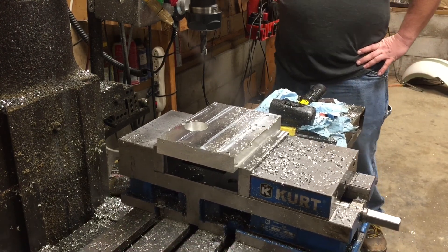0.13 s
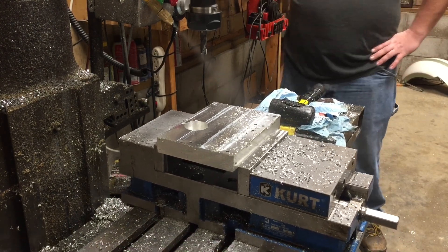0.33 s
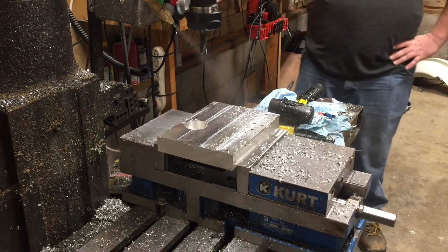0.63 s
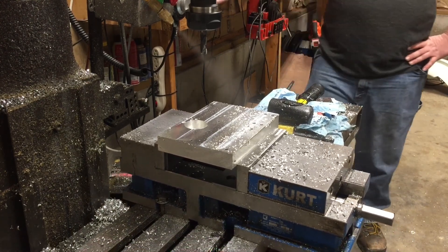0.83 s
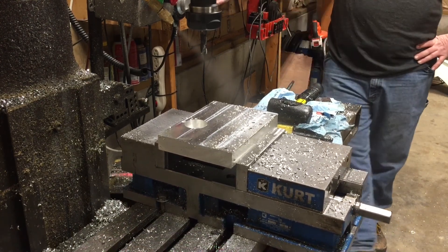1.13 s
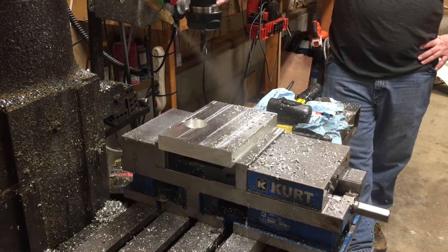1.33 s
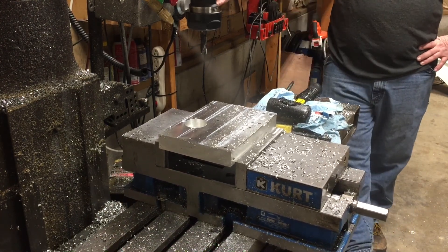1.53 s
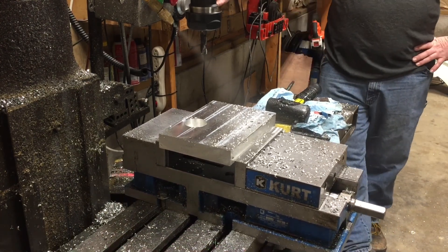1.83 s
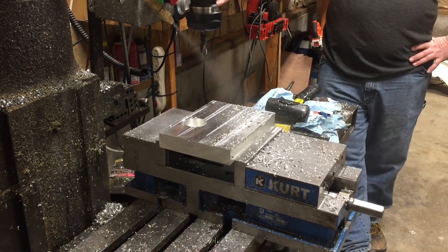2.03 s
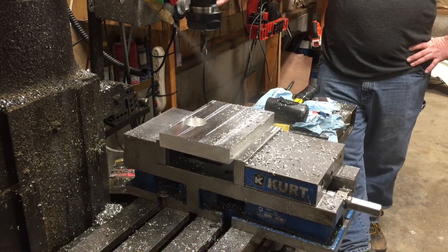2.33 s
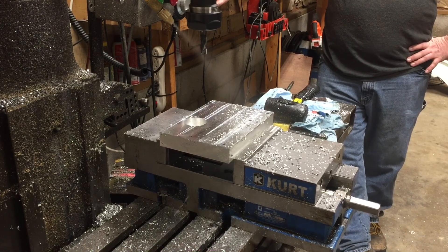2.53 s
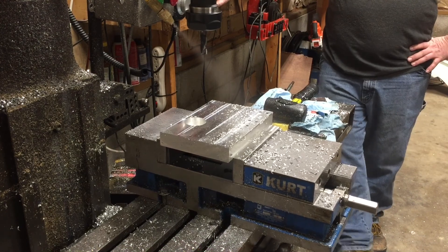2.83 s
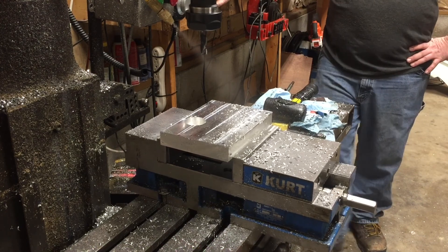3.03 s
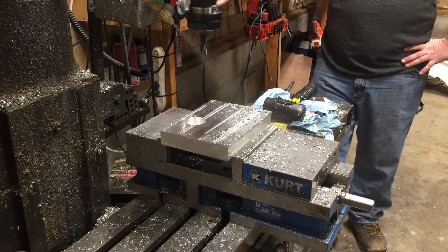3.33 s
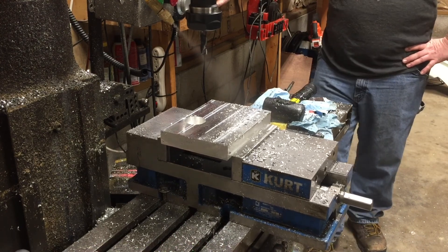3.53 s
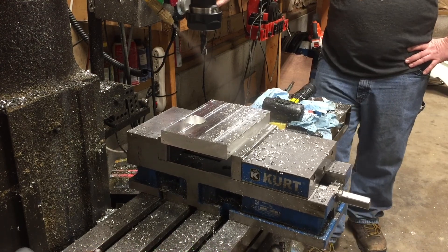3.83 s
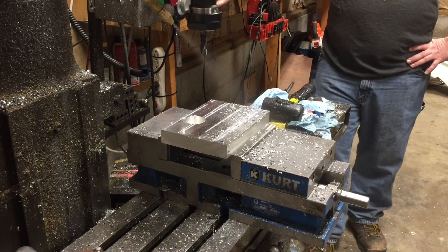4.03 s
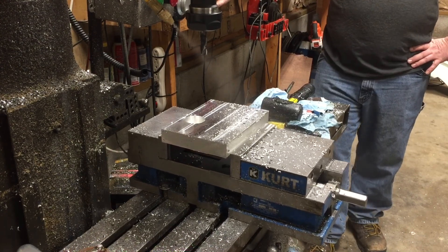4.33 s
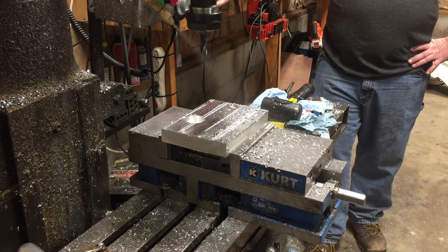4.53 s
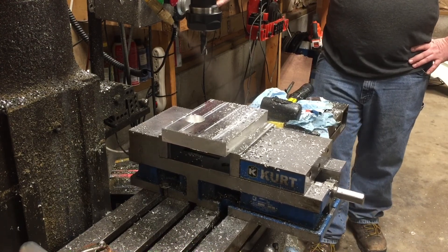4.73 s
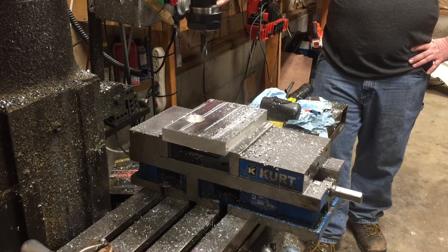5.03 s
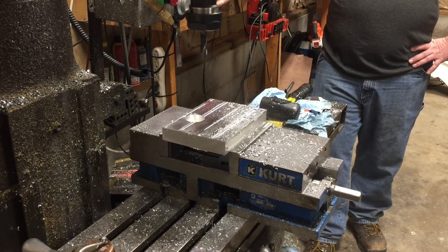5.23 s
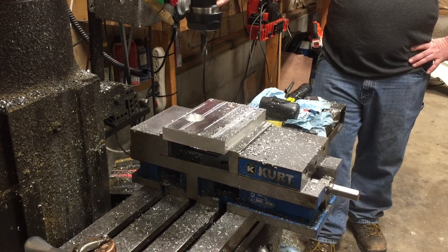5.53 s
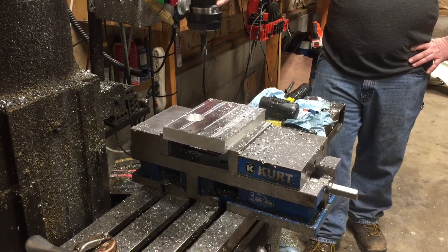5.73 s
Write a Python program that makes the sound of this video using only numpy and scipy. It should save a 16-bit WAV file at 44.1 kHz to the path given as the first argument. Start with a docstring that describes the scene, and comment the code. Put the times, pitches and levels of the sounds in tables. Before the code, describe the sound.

Close, bright, continuous air-jet hiss roaring on metal, with airy ringing that turns hollow, then higher, before the roar fades back.

```python
"""Single microphone held close to a drilled metal plate on a milling machine, in a low, humming workshop.
From the start an air-driven mist sprayer hisses steadily and its jet roars on the plate, with a high ring.
At 0.86 s the ring turns hollow; at 3.65 s it is higher again, and from about 4.5 s the roar eases off.
Hiss, roar and rings are filtered noise and the hum is wavering sines; sliding echoes from nearby steel
comb the treble as the microphone drifts."""
import sys
import numpy as np
from scipy import signal
from scipy.fft import rfft, irfft
from scipy.io import wavfile

SR = 44100
rng = np.random.default_rng(int(sys.argv[2]) if len(sys.argv) > 2 else 0)


def digitize_waveform(pressure):
    """Quantize a signal to 16-bit integers and store it at the path in sys.argv[1].

    Rows of a 2-D input are taken as channels; values are limited to [-1, 1].
    """
    field = np.atleast_2d(pressure).T
    bounded = np.clip(field, -1, 1)
    quanta = np.round(bounded * 32767).astype(np.int16)
    wavfile.write(sys.argv[1], SR, quanta)


N = 259749
TIME = np.arange(N) / SR  # s
BINS = np.fft.rfftfreq(N, 1 / SR)  # Hz

# Colour of the workshop's background. Each row: frequency in Hz, relative level in dB per Hz.
SHOP_COLOUR = [(20, -42), (32, -25), (48, -2.5), (68, -1.5), (100, -6.5), (130, -1.5), (185, -1),
               (235, -5.5), (310, -2), (440, -7.5), (560, -7.5), (900, -22), (2000, -60)]
# Machine hum lines. Each row: frequency in Hz, nominal width in Hz, level in dB relative to the hum level.
HUM_LINES = [(61, 5.1, 1), (125, 4.3, -4.5), (179.6, 3.8, -7)]
# Paths off the work, vise and column. Each row: extra delay at the start, middle and end in ms.
ECHO_PATHS_MS = [(1.5, 1.57, 1.59), (1.14, 1.35, 1.66), (1.07, 1.15, 1.22), (2.33, 2.38, 2.4),
                 (2.44, 2.49, 2.6), (2.76, 2.83, 2.94)]
# Strength of those reflections. Each entry: gain as a plain factor, in the order of the paths.
ECHO_GAINS = [0.13, 0.12, 0.058, 0.033, 0.12, 0.13]
# Colour of the free jet at the nozzle. Each row: frequency in Hz, relative level in dB per Hz.
JET_COLOUR = [(350, -31), (640, -11), (1100, -11), (2200, -17.5), (3950, -17.5), (4850, -22), (5500, -14.5),
              (8000, -13), (9200, -9), (10450, -11.5), (11300, -7), (12200, -4), (14400, -3.5), (15600, -6)]
# Shrill resonance of the narrow orifice. Each row: frequency in Hz, nominal width in Hz, relative level in dB.
ORIFICE_MODES = [(14750, 300, -7), (15250, 240, -3), (15590, 220, 0)]
# Force of the jet on the work; only its changes count. Each row: time in seconds, level in dB.
STRIKE_FORCE = [(0.03, -28.5), (0.08, -27.5), (0.55, -25), (2.95, -24.5), (4.52, -24.5), (5.38, -30.5),
                (5.89, -34.5)]
# Colour of air spreading over the metal. Each row: frequency in Hz, relative level in dB per Hz.
ROAR_COLOUR = [(550, -34), (1100, -7.5), (1800, -5), (2700, 0), (3100, 1.5), (3950, -0.5), (4130, -0.5),
               (4600, -1.5), (4900, -5), (5120, -3.5), (5700, -2), (7700, -6), (10400, -7.5), (11300, -3.5),
               (15000, -21)]
# Breathy edge tones in the roar. Each row: frequency in Hz, nominal width in Hz, relative level in dB.
EDGE_MODES = [(2470, 110, 0), (2640, 150, 1), (3860, 130, 1)]
# Hollow air resonances around the cut. Each row: frequency in Hz, nominal width in Hz, relative level in dB.
HOLLOW_MODES = [(672, 104, -0.5), (837, 144, 2), (1320, 190, 1), (1648, 48, 3.5), (2084, 30, 6.5),
                (2410, 73, 6), (3350, 38, 5), (3670, 93, -1.5), (4600, 160, -5), (5140, 120, -3)]
# Higher air resonances around the cut. Each row: frequency in Hz, nominal width in Hz, relative level in dB.
HIGHER_MODES = [(1123, 90, 0), (1264, 90, -0.5), (1555, 225, 1), (1954, 194, 2), (2234, 140, 0),
                (2890, 250, -4.5), (3690, 190, -5.5), (5270, 58, -18)]
# Low puff of air. Each row: frequency in Hz, nominal width in Hz, relative level in dB.
PUFF_MODES = [(348, 145, 0)]


def amp(db):
    """Turns decibels into gain."""
    return 10 ** (np.asarray(db) / 20)


def unit(x):
    """Scales to an rms of 1."""
    return x / np.sqrt(np.mean(x ** 2) + 1e-20)


def colour(points):
    """Gain at every frequency, from level points joined on a log-frequency axis."""
    hz, db = np.transpose(points)
    return amp(np.interp(np.log(BINS + 1), np.log(hz + 1), db))


def resonances(modes):
    """Gain at every frequency of a set of steep-sided resonances, summed as power."""
    power = 0
    for hz, width, db in modes:
        peak = amp(db) / (1 + ((BINS - hz) / (0.6 * width)) ** 2)
        power = power + peak ** 2
    return np.sqrt(power)


def turbulence(gain):
    """Noise of rms 1 with the given gain over frequency."""
    white = rfft(rng.standard_normal(N))
    return unit(irfft(white * gain, N))


def wander(rate_hz):
    """Random motion of rms 1, mostly slower than the given rate."""
    return turbulence(1 / (1 + (BINS / rate_hz) ** 4))


def machine_hum(level_db=-58.5, waver_db=1.5, drift_share=0.246, throb_hz=6.5, throb_depth=0.73):
    """Sine lines that waver in pitch and level, the lowest one throbbing."""
    lines = []
    for hz, width, db in HUM_LINES:
        pitch_hz = hz + drift_share * width * wander(width)
        tone = np.sqrt(2) * np.sin(2 * np.pi * np.cumsum(pitch_hz) / SR)  # rms 1
        lines.append(amp(level_db + db + waver_db * wander(width)) * tone)
    throb = 1 + throb_depth * np.sin(2 * np.pi * (throb_hz * TIME + rng.random()))
    return throb * lines[0] + sum(lines[1:])


def workshop(rumble_db=-49.5):
    """Low room noise behind the machine, with the hum on top."""
    return amp(rumble_db) * turbulence(colour(SHOP_COLOUR)) + machine_hum()


def reflections(x, count=14):
    """Adds short treble echoes whose paths change as the microphone moves: a slowly sliding comb."""
    # small faces mirror only short waves
    treble = irfft(rfft(x) * BINS ** 4 / (BINS ** 4 + 4500 ** 4), N)
    # ten times finer sampling lets the delays slide smoothly
    fine = signal.resample_poly(treble, 10, 1)
    fine_time = np.arange(len(fine)) / (10 * SR)
    # tools and fittings further off add faint, mostly later echoes (ms)
    first_ms = rng.uniform(1.8, 9, (count, 1))
    clutter_ms = first_ms + np.cumsum(rng.normal(0, .07, (count, 3)), 1)
    paths = list(ECHO_PATHS_MS) + list(clutter_ms)
    gains = list(ECHO_GAINS) + [.06] * count
    out = x.copy()
    for path_ms, gain in zip(paths, gains):
        # smooth arc through the start, middle and end of the path
        arc = np.polyfit([0, .5, 1], path_ms, 2)
        delay_s = np.polyval(arc, TIME / TIME[-1]) / 1000
        out += gain * np.interp(TIME - delay_s, fine_time, fine, left=0)
    return out


def nozzle(level_db=-21.5, shrill_db=-29.0, sputter_db=0.9, sputter_hz=900):
    """Bright hiss of the free jet; coolant tearing into droplets gives it a fine grain."""
    jet = amp(level_db) * turbulence(colour(JET_COLOUR))
    shrill = amp(shrill_db) * turbulence(resonances(ORIFICE_MODES))
    return (jet + shrill) * amp(sputter_db * wander(sputter_hz))


def strike_force():
    """Force of the jet on the work over time, in dB about its median."""
    seconds, db = np.transpose(STRIKE_FORCE)
    force_db = np.interp(TIME, seconds, db)
    return force_db - np.median(force_db)


def hollowness(from_s=0.86, until_s=3.65, changeover_s=0.072):
    """Ramps from 0 to 1 where the cut rings hollow and back where it rings higher, centred on those times."""
    inside_s = np.minimum(TIME - from_s, until_s - TIME)
    return np.clip(.5 + inside_s / changeover_s, 0, 1)


def plate_roar(hollow, roar_db=-24.5, edge_db=-33.0, edge_gain_db=0.4):
    """Eddies of air spreading over the metal roar, with breathy edge tones among them."""
    roar = amp(roar_db) * turbulence(colour(ROAR_COLOUR))
    edge = amp(edge_db + edge_gain_db * hollow) * turbulence(resonances(EDGE_MODES))
    return roar + edge


def cut_rings(hollow, hollow_db=-39.0, hollow_gain_db=6.0, higher_db=-31.0, higher_loss_db=6.5,
              higher_growth_db_per_s=0.46):
    """The eddies excite air around the cut; hollow and higher rings trade places, the higher slowly growing."""
    low_ring = amp(hollow_db + hollow_gain_db * hollow) * turbulence(resonances(HOLLOW_MODES))
    high_level_db = higher_db + higher_growth_db_per_s * TIME - higher_loss_db * hollow
    high_ring = amp(high_level_db) * turbulence(resonances(HIGHER_MODES))
    return low_ring + high_ring


def low_puff(hollow, level_db=-53.0):
    """Low band of moving air that falls silent while the cut rings hollow."""
    return amp(level_db) * (1 - hollow) * turbulence(resonances(PUFF_MODES))


def strike(roar_steepness=1.33, ring_steepness=0.9, gust_db=0.3, gust_hz=12):
    """The jet on the plate: roar and rings grow as it hits squarely (steepness in dB per dB of force)."""
    force_db = strike_force()
    hollow = hollowness()
    roar = amp(roar_steepness * force_db) * plate_roar(hollow)
    rings = amp(ring_steepness * force_db) * cut_rings(hollow)
    return (roar + rings + low_puff(hollow)) * amp(gust_db * wander(gust_hz))


def scene():
    """Workshop and close spray reach one microphone, the same in both channels."""
    sound = workshop() + reflections(nozzle() + strike())
    return np.array([sound, sound])


def record(dry, low_cut_hz=36, band_limit_hz=15800):
    """The microphone's bass roll-off, then the recorder's steep band limit."""
    roll_off = BINS ** 4 / np.hypot(BINS ** 4, low_cut_hz ** 4)
    thinned = irfft(rfft(dry) * roll_off, N)
    taps = signal.firwin(1023, band_limit_hz, window=("kaiser", 9), fs=SR)
    return signal.oaconvolve(thinned, taps[None], "same")


dry = scene()
out = record(dry)
digitize_waveform(out)
```